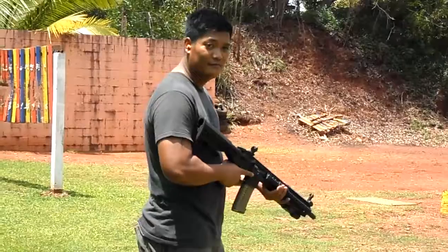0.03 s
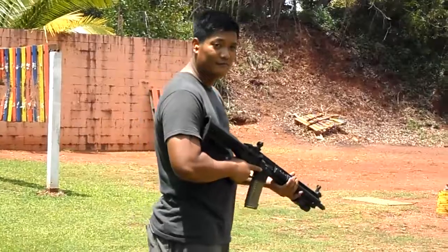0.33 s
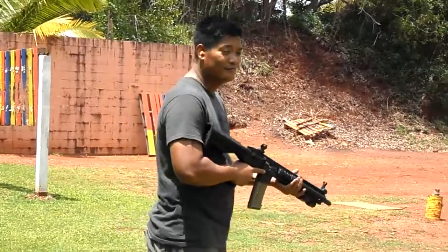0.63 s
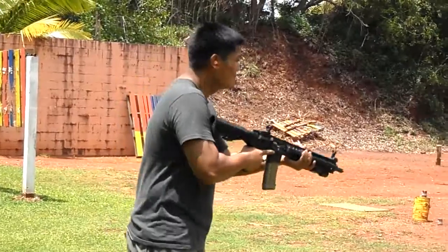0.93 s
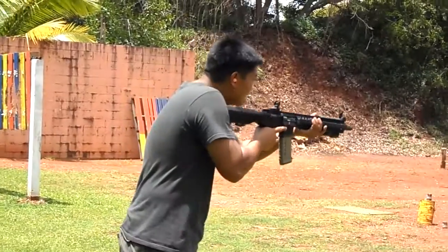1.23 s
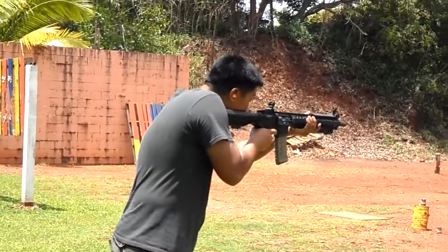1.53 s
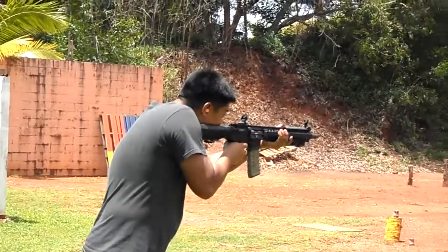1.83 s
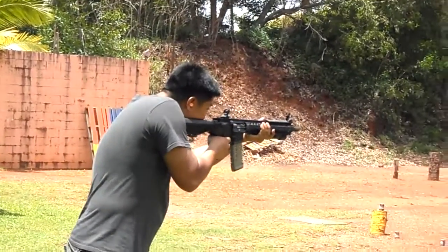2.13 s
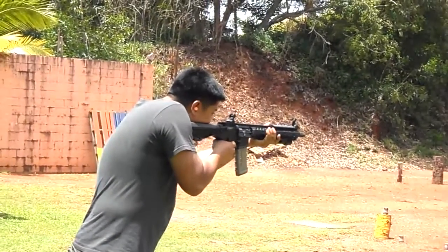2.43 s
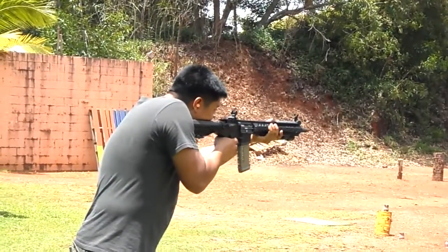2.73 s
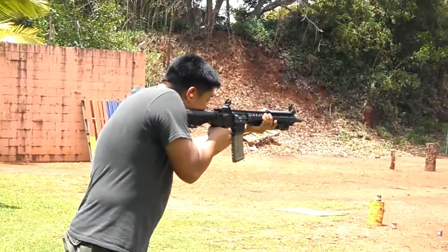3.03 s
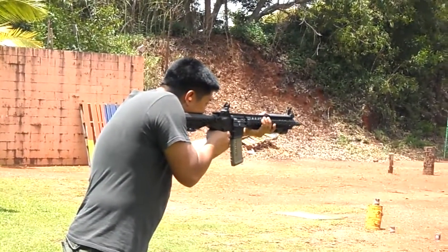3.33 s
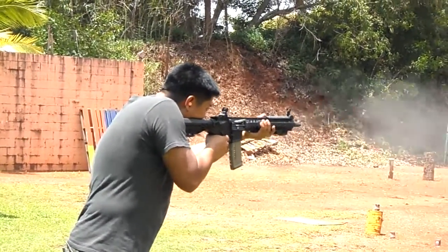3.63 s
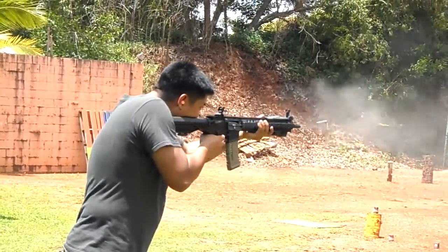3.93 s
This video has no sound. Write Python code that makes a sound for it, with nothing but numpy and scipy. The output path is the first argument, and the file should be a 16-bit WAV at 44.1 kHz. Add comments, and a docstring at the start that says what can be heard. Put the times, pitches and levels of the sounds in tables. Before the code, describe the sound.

Four fast automatic rifle shots crack out outdoors, following faint background noise and a small click.

```python
"""A rifle fires a fast automatic burst of four shots on an outdoor range in light wind.
Expanding muzzle gas gives each shot a crack and a low pressure pulse, and the bolt clacks back.
Ground, posts and a wall reflect the sound as slaps; trees and an earth bank scatter it into a rolling tail.
Beforehand, over a faint distant hum, cloth rustles and the safety catch and other parts click as the
rifle is shouldered. The nearby microphone overloads on the blasts."""
import sys
import numpy as np
from scipy import signal
from scipy.fft import rfft, irfft
from scipy.io import wavfile

SR = 44100
rng = np.random.default_rng(int(sys.argv[2]) if len(sys.argv) > 2 else 0)


def transcribe(u):
    """Save the signal u as a 16-bit wav file named by the first command-line argument.

    u: samples, shape (n,) or (channels, n), limited to [-1, 1]; the rate is SR.
    q: integer samples, one column per channel.
    """
    v = np.clip(np.atleast_2d(u).T, -1, 1)
    q = np.round(v * 32767).astype(np.int16)
    wavfile.write(sys.argv[1], SR, q)


N = 176400
RING = SR // 2  # samples in one short sound
TIME, AGE = np.arange(N) / SR, np.arange(RING) / SR  # seconds into the scene and into a short sound

# Spectra. Each row: frequency in Hz, relative spectral density in dB.
AIR_SPECTRUM = [(15, -30.5), (25, 1.5), (96, -8), (148, -16), (216, -14.5), (284, -20), (352, -18),
                (473, -23), (557, -23.5), (881, -26), (1220, -29), (2660, -35.5), (15800, -43.5)]  # outdoor background
CLOTH_SPECTRUM = [(200, -4), (900, 1), (2000, -2.5), (4000, -8), (9000, -14), (15500, -13)]  # rubbing shirt
WIND_SPECTRUM = [(15, 0), (45, -1.5), (80, -14), (160, -24.5), (500, -66), (4000, -100)]  # wind on the microphone
CRACK_SPECTRUM = [(60, -24), (340, 5), (1000, -6.5), (1800, -5), (3500, -12), (5200, -14.5), (6300, -13.5),
                  (7800, -17), (9500, -22.5), (15500, -24.5)]  # muzzle gas
SLAP_SPECTRUM = [(40, -6), (100, -0.5), (300, 2.5), (800, -5), (1700, -4.5), (3200, -16.5), (6500, -25),
                 (9500, -28.5), (15500, -30)]  # echoes from hard surfaces
SCATTER_SPECTRUM = [(30, -20), (70, -3), (170, -4.5), (300, 8), (480, -1.5), (750, 1.5), (1200, -5),
                    (1800, -13), (3200, -17.5), (6500, -23.5), (9500, -30), (15500, -34)]  # diffuse tail
BANK_SPECTRUM = [(100, -12), (280, -8.5), (450, 10), (750, -3.5), (1300, -8), (3000, -18.5), (15000, -76)]  # the earth bank's dull return
BOLT_SPECTRUM = [(300, -27), (1200, -14), (1800, 20), (3000, -12), (6000, -16), (9000, -9), (15500, -13)]  # clack of the action
# Tones of the distant hum. Each row: frequency in Hz, rms level in dB.
HUM_TONES = [(218, -79), (355, -80.5)]
# Cloth rustles. Each row: centre in seconds, half-width in seconds, level in dB, cutoff in Hz.
CLOTH_RUSTLES = [(0.755, 0.026, -64, 322), (1.193, 0.05, -71, 15300), (1.276, 0.054, -77.5, 12000),
                 (1.403, 0.027, -74, 5000), (2.39, 0.028, -71.5, 2000)]
# Clicks of the rifle's parts. Each row: start in seconds, level in dB, ring frequency in Hz,
# T60 in seconds, cutoff in Hz, boost of the overtones in dB.
PART_CLICKS = [(0.728, -57.5, 1530, 0.012, 7000, 2), (1.069, -60.5, 940, 0.042, 3000, -8),
               (1.6047, -37, 1670, 0.0055, 5360, -5)]
# Modes of a clicking part. Each row: ratio to the ring frequency, level in dB.
PART_MODES = [(.45, -28), (1, 2), (1.46, -4.5), (2.13, -27), (2.9, -17)]
# Puffs of wind. Each row: centre in seconds, half-width in seconds, level in dB.
WIND_PUFFS = [(.93, 0.018, -52.5), (1.02, 0.057, -54.5), (1.17, 0.023, -55), (2.87, 0.1, -55)]
# The burst. Each row: start in seconds, blast, crack and slap levels in dB, wall delay in seconds.
BURST_SHOTS = [(3.6739, -16, -14.5, -19, 0.028), (3.7592, -15, -21.5, -18, .0257),
               (3.8435, -15.5, -23, -16.5, .0257), (3.9263, -15.5, -23.5, -16.5, 0.026)]
# Reflection paths. Each row: delay in seconds, level in dB, T60 of the smear in seconds.
NEAR_PATHS = [(.0082, -5, 0.021), (.0125, -8.5, 0.016)]  # ground and posts, timed from the shot
WALL_PATHS = [(0, -1.5, 0.016), (.0056, -8, 0.009), (.026, -12, .03)]  # the wall, timed from its first return
# Decay of the diffuse tail. Each row: frequency in Hz, T60 in seconds.
SCATTER_DECAY = [(100, 0.47), (500, 0.62), (1500, 1), (4000, 0.56), (12000, 0.5)]


def amp(db):
    """Amplitude grows tenfold for every 20 dB."""
    return 10 ** (np.asarray(db) / 20)


def unit(x):
    """Normalisation to an rms of 1."""
    return x / np.sqrt(np.mean(x ** 2) + 1e-20)


def along(points, hz):
    """Interpolation on a logarithmic frequency axis."""
    frequencies, values = np.transpose(points)
    return np.interp(np.log(hz + 1), np.log(frequencies + 1), values)


def fade(t60, age=AGE):
    """Exponential damping: a fall of 60 dB in t60 seconds."""
    return np.exp(-np.log(1000) * age / t60)


def noise(spectrum, size):
    """Spectral shaping turns white noise into coloured noise of rms 1."""
    gain = amp(along(spectrum, np.fft.rfftfreq(size, 1 / SR)))
    return unit(irfft(rfft(rng.standard_normal(size)) * gain, size))


def coloured(x, spectrum):
    """A minimum-phase filter colours causally; this one keeps the power of white noise."""
    cepstrum = irfft(np.log(amp(along(spectrum, np.fft.rfftfreq(RING, 1 / SR)))), RING)
    cepstrum[1:RING // 2] *= 2
    cepstrum[RING // 2 + 1:] = 0
    pulse = irfft(np.exp(rfft(cepstrum)), RING)
    return signal.fftconvolve(x, pulse / np.linalg.norm(pulse))[:len(x)]


def dulled(x, hz):
    """A fourth-order low-pass attenuates the treble."""
    return signal.sosfilt(signal.butter(4, hz, fs=SR, output='sos'), x)


def add(track, start_s, sound):
    """Superposition: a sound adds linearly to the track."""
    start = round(start_s * SR)
    track[start:start + len(sound)] += sound[:len(track) - start]


def swell(centre_s, half_s, db, time=TIME):
    """A Gaussian envelope whose half-width is its standard deviation."""
    return amp(db) * np.exp(-.5 * ((time - centre_s) / half_s) ** 2)


def background(linewidth_hz=6, air_db=-61.5):
    """Phase diffusion broadens the tones of a far hum, heard in the steady noise of open air."""
    hum = np.zeros(N)
    for hz, db in HUM_TONES:
        drift = np.cumsum(rng.standard_normal(N)) * np.sqrt(2 * np.pi * linewidth_hz / SR)
        hum += amp(db) * np.sqrt(2) * np.sin(2 * np.pi * hz * TIME + drift)
    return hum + amp(air_db) * noise(AIR_SPECTRUM, N)


def rustles():
    """Friction in the shirt's cloth radiates brief swells of noise."""
    return sum(swell(centre_s, half_s, db) * unit(dulled(noise(CLOTH_SPECTRUM, N), cutoff_hz))
               for centre_s, half_s, db, cutoff_hz in CLOTH_RUSTLES)


def clicks(snap_db=-3.5, snap_t60=0.0022):
    """Impact gives a broadband snap and excites the damped, inharmonic modes of a small part."""
    out = np.zeros(N)
    for start_s, db, hz, t60, cutoff_hz, boost_db in PART_CLICKS:
        modes = sum(amp(mode_db + boost_db * (ratio > 1)) * np.sin(2 * np.pi * hz * ratio * AGE)
                    for ratio, mode_db in PART_MODES)
        snap = amp(snap_db) * fade(snap_t60) * rng.standard_normal(RING)
        add(out, start_s, amp(db) * dulled(snap - modes * fade(t60), cutoff_hz))
    return out


def wind():
    """Turbulent pressure on the microphone makes a low rumble with each puff."""
    return sum(swell(*puff) for puff in WIND_PUFFS) * noise(WIND_SPECTRUM, N)


def crack(rise_s=0.00035, hold_s=0.002, t60=0.02):
    """Turbulence in the escaping gas radiates a few milliseconds of broadband noise."""
    attack = 1 - np.exp(-(AGE / rise_s) ** 2)
    release = fade(t60, np.maximum(AGE - hold_s, 0))
    return coloured(attack * release * rng.standard_normal(RING), CRACK_SPECTRUM)


def blast(push_s=0.0062, rise_s=0.0015, thump_hz=166, thump_db=-9.5, low_cut_hz=37.7):
    """A blast wave is a compression, then a longer rarefaction; the gas cloud adds a brief low ring."""
    pulse = (1 - AGE / push_s) * np.exp(-AGE / push_s)
    thump = amp(thump_db) * np.sin(2 * np.pi * thump_hz * AGE) * fade(t60=0.034)
    attack = 1 - np.exp(-(AGE / rise_s) ** 2)
    wave = signal.lfilter(*signal.butter(1, low_cut_hz, 'high', fs=SR), (pulse + thump) * attack)
    return wave / np.abs(wave).max()


def terrain(scatter_db=-25.5, rise_s=0.0063):
    """Diffuse scattering by trees and ground decays band by band, under the bank's broad echo."""
    hz, age, bands = signal.stft(noise(SCATTER_SPECTRUM, RING), SR, nperseg=256)
    decay = fade(along(SCATTER_DECAY, hz)[:, None], age)
    tail = signal.istft(bands * decay, SR, nperseg=256)[1][:RING]
    bank = noise(BANK_SPECTRUM, RING) * swell(centre_s=0.055, half_s=0.011, db=-29, time=AGE)
    return (amp(scatter_db) * tail + bank) * (1 - np.exp(-AGE / rise_s))


def slaps(paths, front=3.6):
    """Reflection from each surface returns a sharp front with a short smear behind it."""
    echoes = np.zeros(RING)
    for delay_s, db, t60 in paths:
        smear = fade(t60) * rng.standard_normal(RING)
        smear[0] = -front
        add(echoes, delay_s, amp(db) * smear)
    return coloured(echoes, SLAP_SPECTRUM)


def surroundings():
    """Multipath propagation: the responses of the near ground, the wall and the terrain."""
    return np.array([slaps(NEAR_PATHS), slaps(WALL_PATHS), terrain()])


def bolt(db=-29, t60=0.018):
    """The impact of the recoiling bolt makes a bright, quickly damped clack."""
    return amp(db) * coloured(fade(t60) * rng.standard_normal(RING), BOLT_SPECTRUM)


def burst(shared_power=0.88, blast_lag_s=0.003, bolt_lag_s=0.0095, return_lag_s=0.0011, return_db=-6):
    """Sound from every shot travels the same paths, so the echoes are largely alike."""
    out, shared = np.zeros(N), surroundings()
    for start_s, blast_db, crack_db, slap_db, wall_s in BURST_SHOTS:
        near, wall, tail = np.sqrt(shared_power) * shared + np.sqrt(1 - shared_power) * surroundings()
        add(out, start_s, amp(crack_db) * crack() + amp(slap_db) * near + tail)
        add(out, start_s + blast_lag_s, amp(blast_db) * blast())
        add(out, start_s + bolt_lag_s, bolt())
        add(out, start_s + wall_s, amp(slap_db) * wall)
        # the wall returns the blast wave too
        add(out, start_s + wall_s + return_lag_s, amp(blast_db + return_db) * blast())
    return out


def scene():
    """The pressures of all sources superpose at one microphone."""
    return (burst() + rustles() + clicks() + background() + wind())[None]


def record(dry, on_s=0.247, ceiling_db=-10.5, knee=4.8, band_limit_hz=16100):
    """The microphone comes on; saturation rounds its loudest peaks and a low-pass limits its band."""
    live = dry * (TIME > on_s)
    saturated = live / (1 + np.abs(live / amp(ceiling_db)) ** knee) ** (1 / knee)
    return signal.sosfilt(signal.ellip(12, .1, 80, band_limit_hz, fs=SR, output='sos'), saturated)


dry = scene()
out = record(dry)
transcribe(out)
```